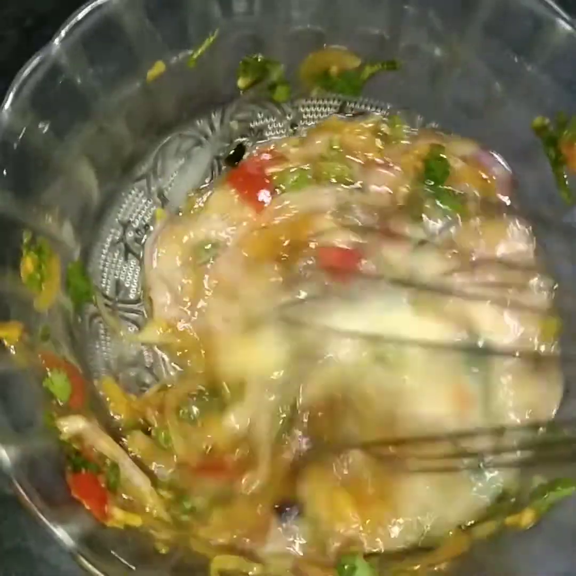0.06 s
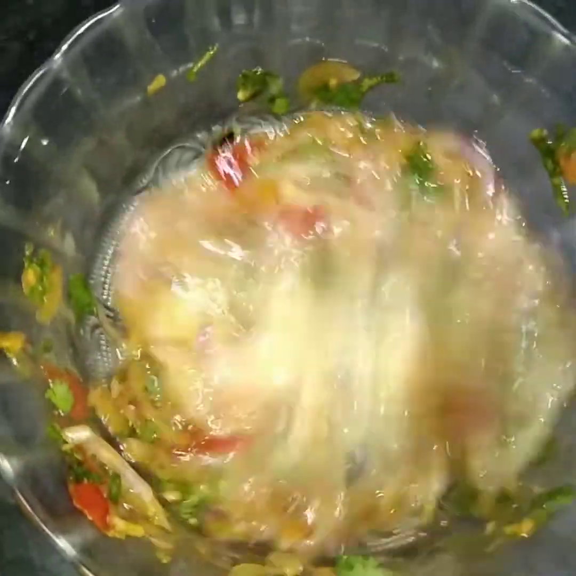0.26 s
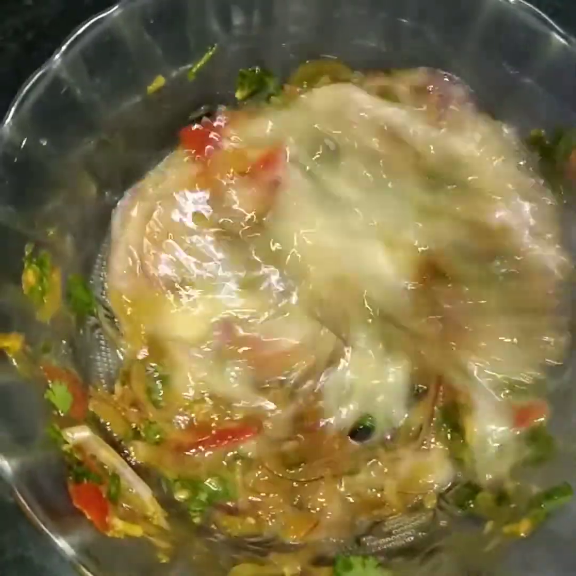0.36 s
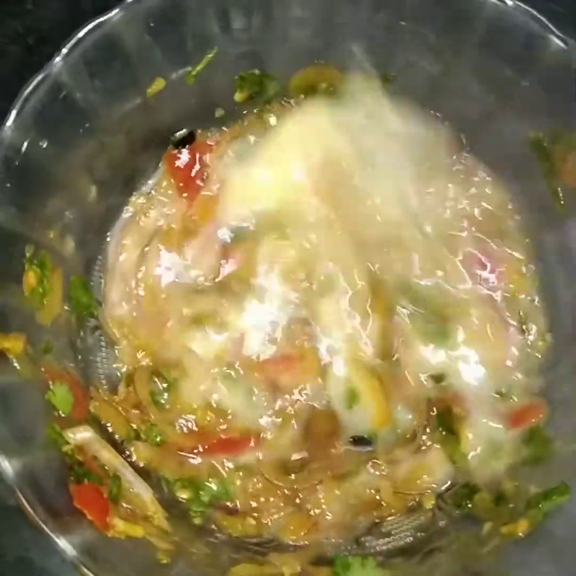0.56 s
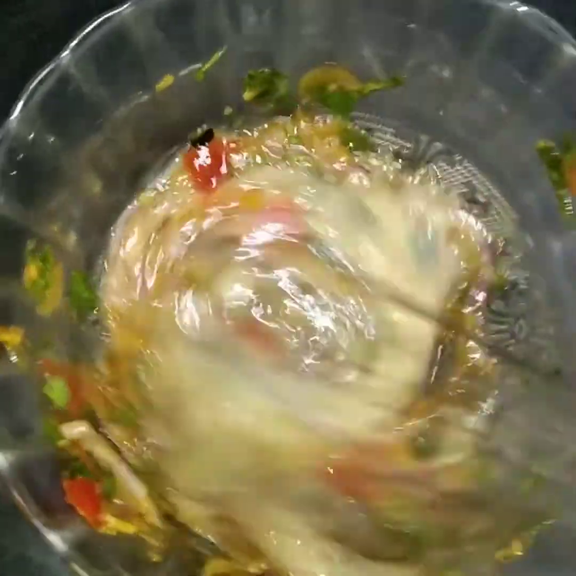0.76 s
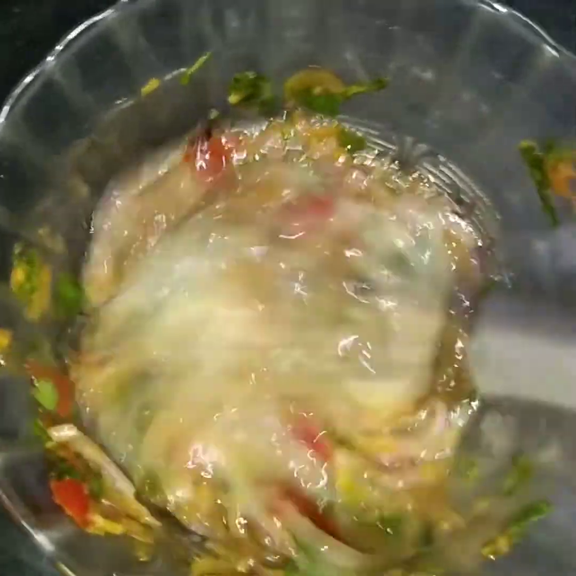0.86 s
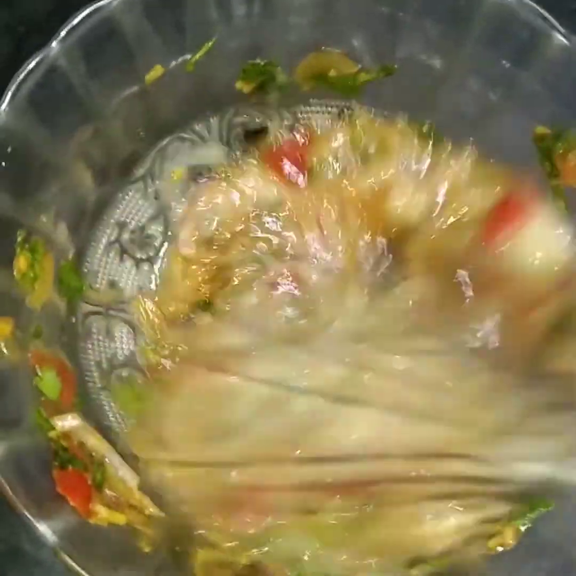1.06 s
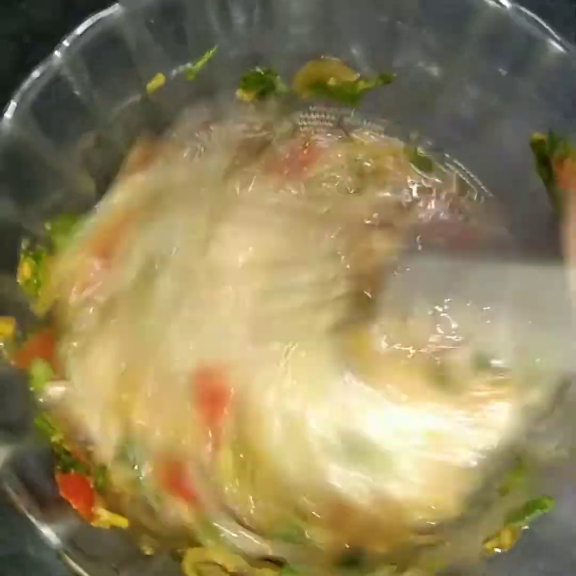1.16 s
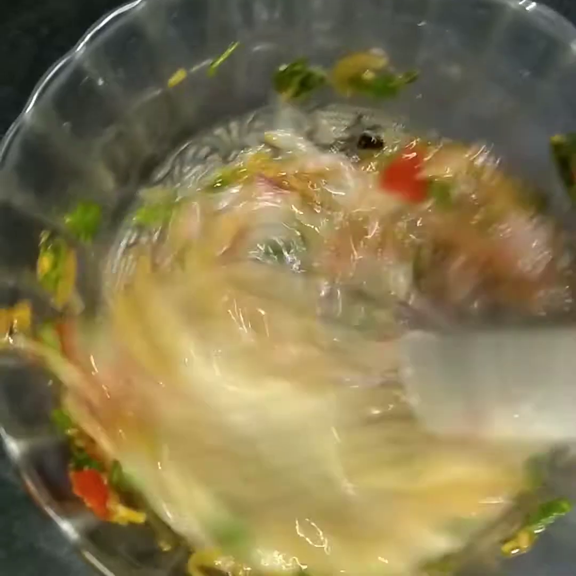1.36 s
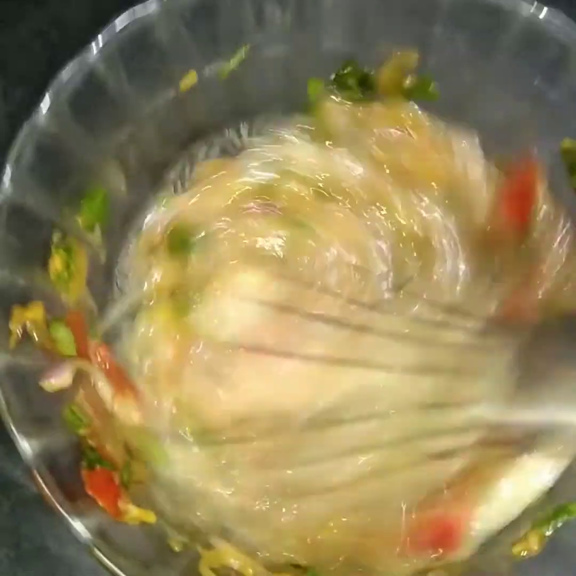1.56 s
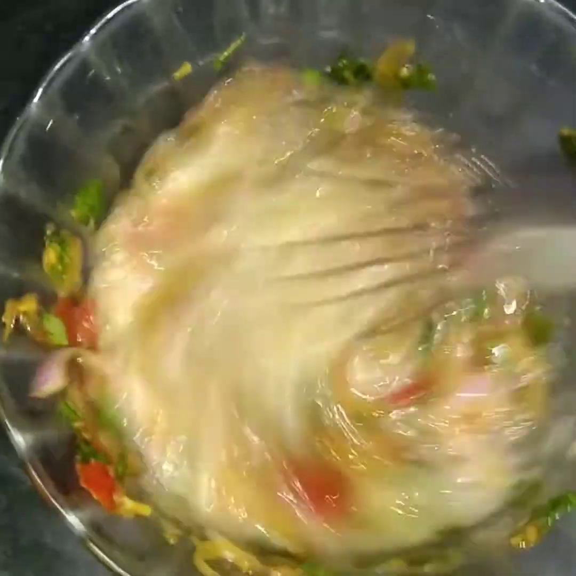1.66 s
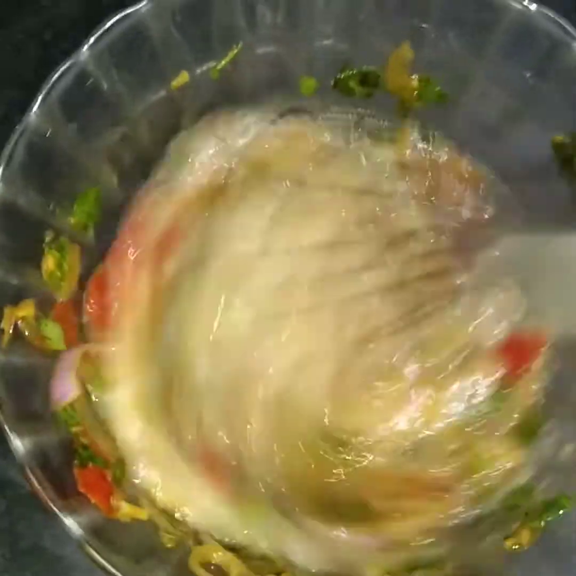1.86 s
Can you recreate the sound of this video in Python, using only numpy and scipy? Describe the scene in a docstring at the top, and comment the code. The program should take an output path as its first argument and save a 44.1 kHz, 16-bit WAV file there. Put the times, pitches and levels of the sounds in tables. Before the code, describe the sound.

Whisk beating eggs in a glass bowl: sharp clinks, dull knocks, ticks and soft wet sloshing

```python
"""In a small kitchen, close to a phone, a wire whisk beats eggs and chopped vegetables in a glass bowl.
Clinks on the glass and dull knocks of the loaded bowl are sums of decaying modes, each with a noisy crack.
Wire ticks, a softer scrape near 1.5 s, low thuds, mid-band dabs and short high clicks are resonant noise
bursts coloured by the glass; a low-mid rumble swells with the heavy blows and dies away. The mix sloshes as
patchy noise with bubbles; the bowl's echo, a hum and a faint hiss fill the room."""
import sys
import numpy as np
from scipy import signal
from scipy.fft import rfft, irfft, next_fast_len
from scipy.io import wavfile
from scipy.ndimage import uniform_filter1d

SR = 44100
rng = np.random.default_rng(int(sys.argv[2]) if len(sys.argv) > 2 else 0)


def how_loud(loudness_db):
    """Turn decibels into a plain amplitude multiplier (0 dB gives 1, 20 dB gives 10)."""
    steps = np.asarray(loudness_db, float) / 20
    return 10 ** steps


def put_to_file(sound):
    """Save the sound as 16-bit audio at rate SR, in the file named by the first command-line argument."""
    columns = np.atleast_2d(sound).T  # one column per channel
    safe = np.clip(columns, -1, 1)
    whole_steps = np.round(safe * 32767)
    wavfile.write(sys.argv[1], SR, whole_steps.astype(np.int16))


N = 83790  # length [samples]

# modes of the glass wall: (frequency [Hz], relative level [dB], free t60 [s])
GLASS_MODES = [(790, 11.5, 0.11), (1475, 9, 0.12), (1780, -2, .15), (2494, 3, 0.089), (3030, 2.5, 0.15),
               (3270, -1, 0.089), (4502, -1.5, 0.13), (5290, -11, 0.04), (5540, -16.5, 0.027),
               (6040, -2.5, 0.077), (6740, -6.5, .08), (7300, -4, 0.032), (7750, -0.5, .065),
               (7850, -2.5, .09), (8420, -12, 0.052), (9330, -8, .09), (10500, -15.5, .12),
               (10400, -11.5, .06), (11400, -15.5, .1), (13230, -13.5, .08)]


def unit(x):
    """Normalisation by mean power: scales x to rms 1."""
    return x / np.sqrt(np.mean(x ** 2) + 1e-20)


def along(points, hz):
    """Logarithmic pitch scale: interpolates (frequency [Hz], value) points along it."""
    point_hz, value = np.transpose(points)
    return np.interp(np.log(hz + 1), np.log(point_hz + 1), value)


def curve(rows):
    """Linear envelope: one value per sample from (time [s], value) rows."""
    return np.interp(np.arange(N) / SR, *np.transpose(rows))


def filtered(x, response):
    """Linear filtering: the spectrum of x times a (complex) response of frequency."""
    size = next_fast_len(len(x) + 8192)
    spectrum = rfft(x, size) * response(np.fft.rfftfreq(size, 1 / SR))
    return irfft(spectrum, size)[:len(x)]


def rush(bands, patchy_db):
    """Turbulence-like noise of rms 1: random gains smoothed over time and frequency make it patchy."""
    z = signal.stft(rng.standard_normal(N + 512), nperseg=512)[2]
    field = uniform_filter1d(rng.standard_normal(z.shape), size=5, axis=0)
    field = uniform_filter1d(field, size=6, axis=1)
    patchy = signal.istft(z * how_loud(patchy_db * unit(field)), nperseg=512)[1][:N]
    return unit(filtered(patchy, lambda hz: how_loud(along(bands, hz))))


def resonance(f, center, width):
    """Damped oscillator: complex response with gain 1 at its centre, width in Hz."""
    return 1j * f * width / (center * center - f * f + 1j * f * width)


def glassy(x, ring_db):
    """Forced vibration: x excites resonances at the glass modes; the total energy stays that of x."""
    width_hz = 85

    def response(f):
        return 1 + how_loud(ring_db) * sum(resonance(f, hz, width_hz) for hz, *_ in GLASS_MODES)

    y = filtered(x, response)
    return y * np.linalg.norm(x) / np.linalg.norm(y)


def bursts(rows, rise_s, skirt_db, ring_db):
    """Resonant excitation: each decaying noise burst fills one resonance and sets the glass ringing."""
    out, t = np.zeros(N + SR), np.arange(SR // 5) / SR
    for start_s, level_db, center, octaves, t60 in rows:
        width = center * octaves * np.log(2)

        def response(f):
            skirt = how_loud(skirt_db) * (f / (f + center)) ** 2  # broad treble beneath the resonance
            return resonance(f, center, width) ** 2 + skirt

        noise = unit(filtered(rng.standard_normal(len(t)), response))
        # the noise is rms 1, so its level is set 9 dB under the nominal peak
        puff = how_loud(level_db - 9 - 60 * t / t60) * (1 - np.exp(-t / rise_s)) * noise
        out[round(start_s * SR):][:len(t)] += glassy(puff, ring_db)
    return out[:N]


def struck(modes, blows, rise_s, crack_db, crack_s):
    """Modal superposition: a blow rings the modes near its favoured pitch, with a crack of like colour.

    crack_db is the crack's rms before decay, relative to a third of the ring's peak; crack_s is its t60."""
    waver_hz, waver_rad = 70, 0.81  # rate and rms size of the steps of each mode's phase walk
    out, t = np.zeros(N + SR), np.arange(SR // 4) / SR
    hz, mode_db, t60 = np.transpose(modes)[:, :, None]
    for start_s, peak_db, spot, reach, ring_share in blows:
        def near(f):
            return 1 / (1 + (np.log2((f + 1) / spot) / reach) ** 2) ** 2

        strength = how_loud(mode_db + rng.normal(0, 1.5, hz.shape)) * near(hz)
        steps = rng.standard_normal((len(modes), 64))
        steps[:, 0] = 0
        walks = steps.cumsum(1)
        drift = waver_rad * np.array([np.interp(t * waver_hz, np.arange(64), walk) for walk in walks])
        decay = how_loud(-60 * t / (t60 * ring_share))
        ring = (strength * decay * np.sin(2 * np.pi * hz * t + drift)).sum(0)
        noise = filtered(rng.standard_normal(len(t)), lambda f: near(f) * f / (f + spot))
        crack = how_loud(crack_db - 60 * t / crack_s) * unit(noise) / 3
        blow = (ring / np.abs(ring).max() + crack) * (1 - np.exp(-t / rise_s))
        out[round(start_s * SR):][:len(t)] += how_loud(peak_db) * blow / np.abs(blow).max()
    return out[:N]


def room_hum():
    """Band-shaped random noise: a low hum whose level drifts."""
    # level of the hum: (time [s], level [dB])
    hum_level = [(0, -66.5), (.3, -54.5), (1.1, -54.5), (1.18, -47), (1.3, -55.5), (1.65, -42), (1.9, -48)]
    # spectrum of the hum: (frequency [Hz], relative density [dB per Hz])
    hum_bands = [(18, -42.5), (30, -10.5), (43, -6.5), (59, 2.5), (81, -8.5), (102, 3), (123, -9),
                 (141, -8.5), (190, -17.5), (250, -41), (420, -120)]
    return how_loud(curve(hum_level)) * rush(hum_bands, patchy_db=0.5)


def low_mid_rumble():
    """Amplitude-modulated noise: low-mid rumble that swells with the heavy blows and dies away."""
    # level of the rumble: (time [s], level [dB])
    rumble_level = [(0, -61), (.07, -56.5), (.17, -68), (.24, -37.5), (.5, -61), (.59, -40.5), (.76, -65.5),
                    (1.45, -62), (1.52, -39), (1.59, -49), (1.9, -48)]
    # spectrum of the rumble: (frequency [Hz], relative density [dB per Hz])
    rumble_bands = [(110, -38.5), (190, -3), (238, -1), (312, -1), (390, -2), (435, 5.5), (600, -2),
                    (910, -57.5), (1540, -120)]
    return how_loud(curve(rumble_level)) * rush(rumble_bands, patchy_db=2.0)


def faint_hiss():
    """Stationary coloured noise: a steady treble floor, patchy in time and frequency."""
    # spectrum of the hiss: (frequency [Hz], relative density [dB per Hz])
    hiss_bands = [(2500, -68), (3500, -12), (6000, -1), (8000, -9), (11000, -8), (14000, -5), (16000, 0.5)]
    return how_loud(-66) * rush(hiss_bands, patchy_db=4)


def bubbles():
    """Bubble resonance: short decaying tones that rise in pitch, at random times, scaled to rms 1."""
    per_second, middle_hz, cycles, loudness_range_db = 400, 1150, 6, 24
    draw = rng.random((int(per_second * N / SR), 3))  # time, pitch, loudness
    t = np.arange(1024) / SR
    hz = middle_hz * np.exp(0.4 * (2 * draw[:, 1:2] - 1))
    age = t * hz / cycles
    tone = np.sin(2 * np.pi * hz * t * (1 + 0.11 * age))
    grains = how_loud(loudness_range_db * draw[:, 2:]) * age * np.exp(-4 * age) * tone
    at = (draw[:, :1] * N).astype(int) + np.arange(len(t))
    return unit(np.bincount(at.ravel(), grains.ravel(), N + len(t))[:N])


def slosh():
    """Turbulent flow: patchy wet noise with bubbles, and an upper band coloured by the glass modes."""
    # level of the slosh: (time [s], level [dB])
    slosh_level = [(0, -50.5), (.25, -53.5), (.4, -49.5), (.8, -48), (.95, -50), (1.22, -48.5), (1.73, -46),
                   (1.9, -45)]
    # spectrum of the slosh: (frequency [Hz], relative density [dB per Hz])
    slosh_bands = [(350, -54.5), (600, -17), (813, -11), (972, -6), (1050, -4), (2100, -15.5),
                   (2730, -47.5), (4620, -120)]
    # level of the upper band: (time [s], level [dB])
    fizz_level = [(0, -55), (.18, -76.5), (.5, -54.5), (.85, -61.5), (1.2, -66.5), (1.3, -58), (1.9, -51)]
    # spectrum of the upper band: (frequency [Hz], relative density [dB per Hz])
    fizz_bands = [(1700, -38.5), (2100, -18), (2500, 2), (3050, 3.5), (3800, 0), (4200, -15.5), (5300, -13),
                  (9000, -18)]
    fizz = how_loud(curve(fizz_level)) * glassy(rush(fizz_bands, patchy_db=6.5), ring_db=1)
    wet = rush(slosh_bands, patchy_db=2.5) + how_loud(-7) * bubbles()
    return fizz + how_loud(curve(slosh_level)) * wet


def ticks_and_scrape():
    """Resonant bursts: bright wire ticks, and near 1.5 s a softer scrape made of longer bursts."""
    # bursts: (time [s], nominal peak [dB], centre [Hz], width [octaves], t60 [s])
    tick_rows = [(0.0014, -27.5, 8050, 0.53, 0.092), (0.2013, -8.5, 7760, 1, 0.076),
                 (0.2143, -11, 7300, 0.91, 0.035), (0.222, -6, 6580, 0.37, 0.037),
                 (0.2568, -16, 7100, 1, 0.057), (0.3101, -13, 7300, 0.92, 0.049),
                 (0.3198, -5.5, 7400, 0.33, 0.02), (0.3237, -18, 7600, 0.24, 0.065),
                 (0.3346, -8.5, 7920, 0.36, 0.023), (0.5125, -33, 10500, 0.77, 0.013),
                 (0.5552, -2.5, 7300, 0.3, 0.04), (0.5702, -3.5, 7600, 0.31, 0.048),
                 (0.5902, -3, 7460, 0.3, 0.01), (0.6152, -5.5, 8430, 0.23, 0.012),
                 (0.6621, -9, 7520, 0.46, 0.022), (0.6684, -23, 7800, 0.23, 0.023),
                 (0.7217, -12, 7350, 0.64, 0.018), (0.7287, -26, 7600, 0.4, 0.084),
                 (0.7467, -30, 8030, 0.61, 0.046), (0.9037, -39, 8200, 0.93, 0.041),
                 (0.9325, -38.5, 8900, 0.16, 0.044), (0.94, -34, 8050, 0.25, 0.025),
                 (0.9697, -25, 8000, 0.38, 0.035), (1.0101, -41.5, 8200, 0.26, 0.032),
                 (1.2486, -22.5, 7700, 0.24, 0.048), (1.259, -13.5, 8090, 0.5, 0.025),
                 (1.487, -32, 8000, 0.6, 0.13), (1.496, -20.5, 7800, 0.39, 0.07),
                 (1.5078, -28, 7400, 0.27, 0.11), (1.515, -24.5, 7740, 0.15, 0.066),
                 (1.5308, -32, 7560, 0.35, 0.08), (1.5424, -34, 8150, 0.39, 0.06),
                 (1.5578, -29.5, 7800, 0.24, 0.046), (1.5704, -31.5, 7900, 0.54, 0.051),
                 (1.6424, -8, 7800, 0.28, 0.015), (1.6461, -23.5, 7100, 0.59, 0.046),
                 (1.7841, -38.5, 9000, 0.23, 0.056)]
    return bursts(tick_rows, rise_s=0.00031, skirt_db=-11.5, ring_db=8)


def clinks():
    """Modal vibration of a shell: whisk on glass; the spot struck selects modes and the mix damps them."""
    # blows: (time [s], peak [dB], favoured pitch [Hz], reach [octaves], share of free ring time [1])
    clink_blows = [(0.2007, -12, 2430, 1.9, 0.9), (0.205, -11, 2960, 0.18, 0.16),
                   (0.207, -13, 6000, 0.23, 0.76), (0.213, -25, 4700, 0.1, 0.94),
                   (0.2377, -13, 6640, 0.79, 0.65), (0.2532, -18.5, 4400, 0.073, 0.51),
                   (0.263, -27, 3100, 0.21, 0.6), (0.554, -1, 4630, 1.62, 0.63),
                   (0.5634, -8.5, 5440, 0.82, 0.66), (0.5883, -10, 4820, 1.34, 0.25),
                   (0.595, -22.5, 3110, 0.08, 0.64), (0.7168, -29.5, 4600, 0.63, 0.19),
                   (1.643, -36, 5290, 0.055, 0.51), (1.643, -28, 2860, 0.95, 0.19),
                   (0.967, -43, 5500, 0.28, 0.31)]
    return struck(GLASS_MODES, clink_blows, rise_s=0.00053, crack_db=-3.5, crack_s=0.043)


def narrow_bursts():
    """Band-limited transients: low thuds, mid-band dabs and short high clicks."""
    # bursts: (time [s], nominal peak [dB], centre [Hz], width [octaves], t60 [s])
    burst_rows = [(.203, -30, 307, 1, 0.061), (.231, -19, 252, 1, 0.065), (.588, -34.5, 242, 1, 0.26),
                  (.617, -13, 11100, 0.11, 0.02), (.722, -4.5, 10770, 0.43, 0.01),
                  (.899, -36, 3000, 0.27, 0.045), (.906, -23.5, 2950, 0.18, 0.029),
                  (1.012, -29, 11400, 0.55, 0.013), (1.178, -33, 2735, .2, 0.038),
                  (1.262, -28.5, 3665, 0.15, 0.063), (1.273, -37.5, 5730, .1, 0.052),
                  (1.379, -23, 2480, 0.44, 0.034), (1.384, -26.5, 6240, 0.1, 0.045),
                  (1.402, -36.5, 6250, 0.076, 0.12), (1.404, -52, 4510, 0.032, 0.12),
                  (1.493, -24, 2900, 0.3, 0.051), (1.563, -21.5, 3500, 0.21, 0.018),
                  (1.743, -20, 2300, 0.34, 0.038), (1.841, -41, 6000, 0.06, 0.12),
                  (1.845, -50.5, 4500, 0.092, 0.16), (1.866, -33.5, 6950, 0.13, 0.043),
                  (.588, -22, 1880, 0.36, 0.15)]
    return bursts(burst_rows, rise_s=0.0016, skirt_db=-42.5, ring_db=1)


def knocks():
    """Mass-loaded vibration: dull knocks through the mix ring low modes of the bowl on the counter."""
    # low modes of the loaded bowl: (frequency [Hz], relative level [dB], free t60 [s])
    body_modes = [(240, -8.5, 0.15), (300, 10, 0.069), (638, -6, 0.31), (786, -4, 0.1), (858, -3, 0.075),
                  (907.4, -6, 0.13), (1056, 5, 0.036), (1126.6, 0, 0.067), (1227, -13, 0.024),
                  (1364, -8.5, 0.05), (1790, -1.5, 0.059)]
    # blows: (time [s], peak [dB], favoured pitch [Hz], reach [octaves], share of free ring time [1])
    knock_blows = [(0.204, -14, 940, 0.42, 1), (0.23, -2.5, 1140, 1, 0.42), (0.238, -4.5, 1200, 0.45, 0.73),
                   (0.25, -11, 1280, 0.94, 0.92), (0.261, -6.5, 1010, 0.78, 0.65),
                   (0.274, -32, 638, 0.22, 0.71), (0.354, -29, 638, 0.52, 0.31),
                   (0.558, -14, 790, 0.27, 0.84), (0.574, -18, 1090, 0.22, 0.47),
                   (0.596, -19, 751, 0.16, 1), (0.615, -23.5, 770, 0.24, 0.51),
                   (0.634, -24.5, 716, 0.69, 0.23), (0.731, -28.5, 1030, 0.74, 0.99),
                   (0.745, -30.5, 1090, 0.23, 1), (0.758, -26.5, 1045, 0.62, 0.87),
                   (0.776, -26.5, 1070, 0.71, 0.43), (0.789, -30, 1005, 0.87, 1),
                   (0.899, -39, 980, 0.89, 0.7), (0.941, -39, 1067, 0.29, 1), (1.387, -35, 1250, 0.29, 1),
                   (1.494, -29, 1100, 0.59, 0.97), (1.503, -8.5, 1056, 0.44, 0.96),
                   (1.52, -15, 960, 0.51, 0.33), (1.536, -21.5, 980, 1, 0.56), (1.544, -27.5, 910, 1, 0.48)]
    return struck(body_modes, knock_blows, rise_s=0.002, crack_db=-8.0, crack_s=0.037)


def kitchen_echo(x):
    """Diffuse reverberation: x convolved with noise tails in which each frequency has its own decay."""
    # reverberation of the kitchen: (frequency [Hz], t60 [s])
    room_t60 = [(200, 0.26), (800, 0.31), (2500, 0.42), (6000, 0.28), (14000, 0.22)]
    delay_s = 0.004
    out, block = np.zeros(N + 2 * SR), SR // 5  # a new tail for each 0.2 s
    for i in range(0, N, block):
        hz, t, z = signal.stft(rng.standard_normal(SR // 2), SR, nperseg=256)
        decay = how_loud(-60 * t / along(room_t60, hz)[:, None])
        tail = signal.istft(z * decay, SR, nperseg=256)[1]
        wet = signal.fftconvolve(x[i:i + block], tail / np.linalg.norm(tail))
        out[i + round(delay_s * SR):][:len(wet)] += wet
    return out[:N]


def scene():
    """Superposition: the bowl, its echo, the rumble, the slosh and the room's own noise add linearly."""
    room = room_hum() + faint_hiss()
    rumble = low_mid_rumble()
    mix = slosh()
    bowl = ticks_and_scrape() + clinks() + narrow_bursts() + knocks()
    return (bowl + how_loud(-9.5) * kitchen_echo(bowl) + rumble + mix + room)[None]


def low_pass(x):
    """Removes everything above the highest recorded frequency."""
    return signal.sosfilt(signal.butter(12, 16820, fs=SR, output="sos"), x)


def record(dry):
    """Linear colouring, then saturation: overall spectral colour, soft clipping and a sharp band limit."""
    # overall colour, the banded spectrum of whisk and glass with a treble limit: (frequency [Hz], gain [dB])
    overall_colour = [(20, -29), (60, -5), (200, 2), (3500, -3), (4000, -4), (4500, 0), (6300, -2),
                      (6800, -6), (7300, 0.5), (9600, -2), (10300, -6), (12000, -3.5), (15500, -3.5),
                      (15900, -19.5)]
    ceiling, knee, top_hz = 0.95, 6, 16800  # a higher knee bends more abruptly
    coloured = filtered(dry[0], lambda hz: how_loud(along(overall_colour, hz)))
    clipped = coloured / (1 + np.abs(coloured / ceiling) ** knee) ** (1 / knee)
    finished = filtered(clipped, lambda hz: hz < top_hz)[None]
    return low_pass(finished)


dry = scene()
out = record(dry)
put_to_file(out)
```